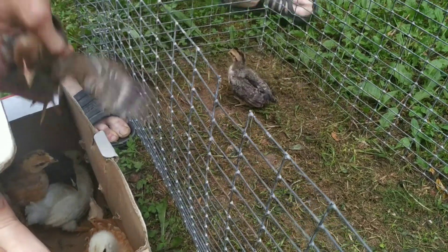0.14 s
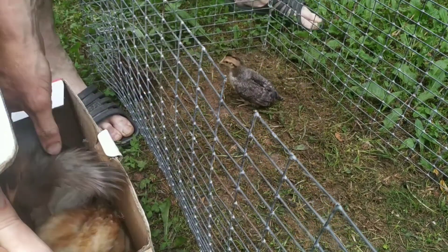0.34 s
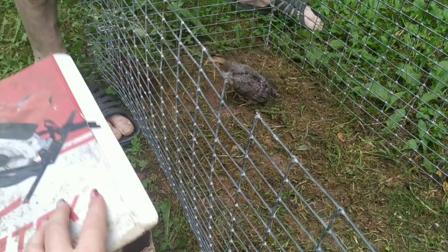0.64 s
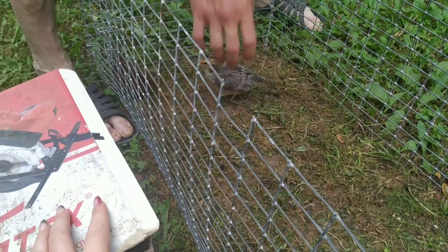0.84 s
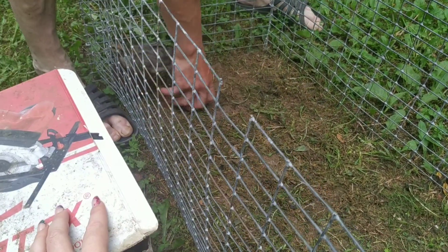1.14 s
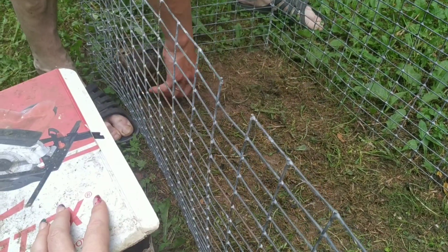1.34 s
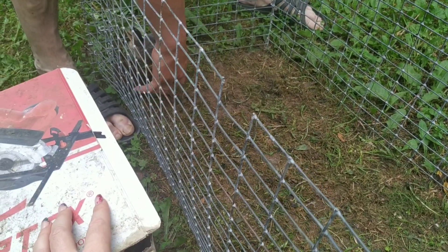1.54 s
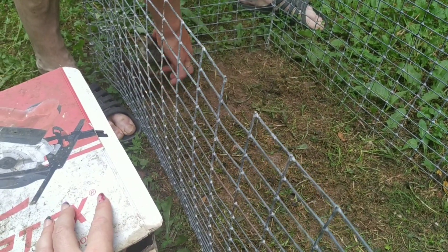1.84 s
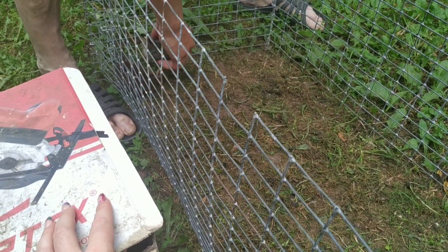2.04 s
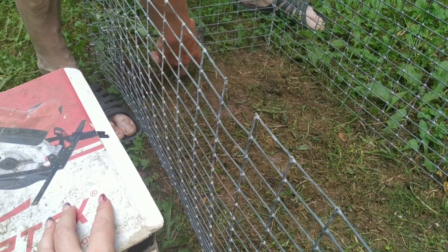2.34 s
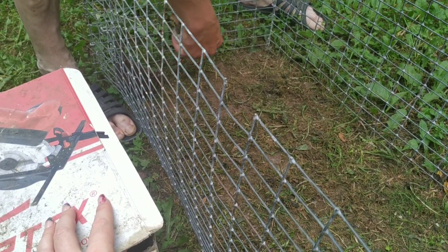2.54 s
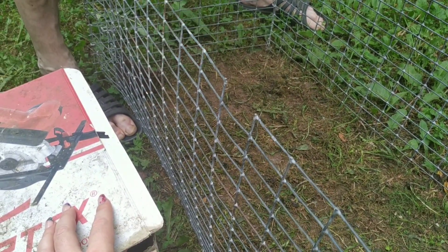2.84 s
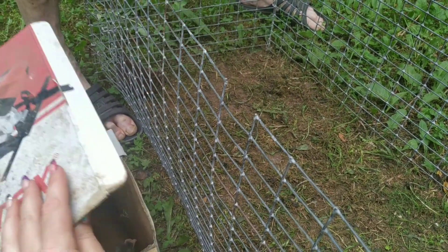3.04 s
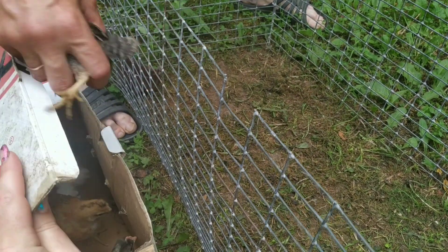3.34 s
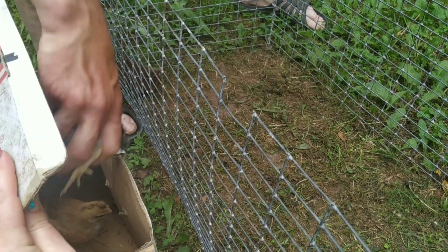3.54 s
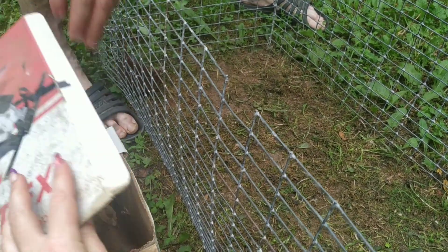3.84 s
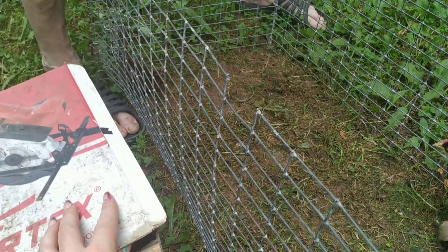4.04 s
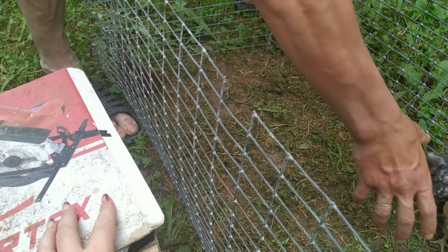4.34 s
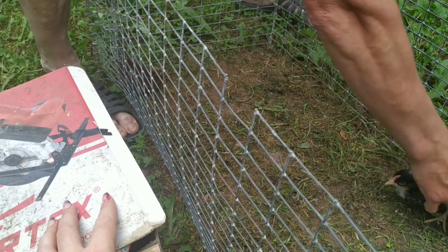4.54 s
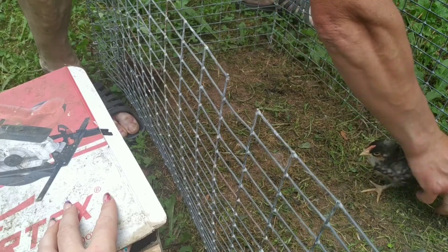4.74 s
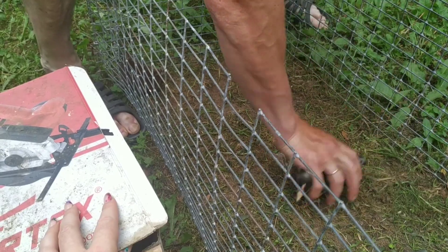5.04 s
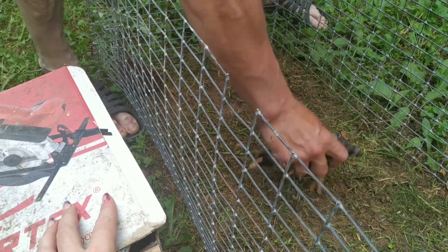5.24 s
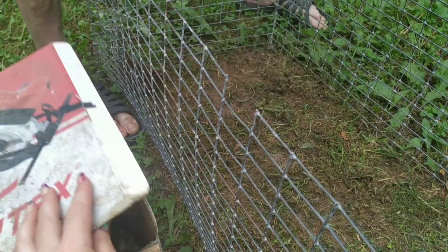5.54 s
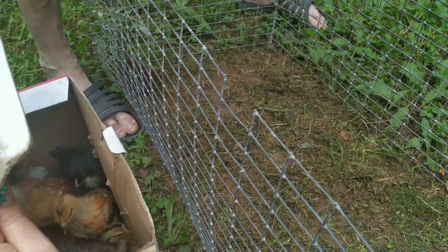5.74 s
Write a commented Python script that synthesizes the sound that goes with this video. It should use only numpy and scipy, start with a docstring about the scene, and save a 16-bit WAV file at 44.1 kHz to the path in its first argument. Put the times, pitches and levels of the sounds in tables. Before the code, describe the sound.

Young chicks peep and chirp in short high whistles while a cardboard box knocks, rustles and squeaks outdoors.

```python
"""Chicks in a cardboard box

Chicks peep, chirp and cry in gliding whistles while hands lift them out of a box on grass.
Their feet scrabble and knock on the board, claws and stalks snap, down and grass rustle,
and the lid and fence squeak by stick-slip under the hands. Two spaced microphones hear
each sound a little apart in time, with short echoes, outdoor air and light wind."""
import sys
import numpy as np
from scipy import signal
from scipy.fft import rfft, irfft, next_fast_len
from scipy.io import wavfile
from scipy.ndimage import uniform_filter1d

SR = 44100
rng = np.random.default_rng(int(sys.argv[2]) if len(sys.argv) > 2 else 0)


def to_wav(s):
    """Save 16-bit WAV."""
    ch = np.atleast_2d(s).T  # columns
    pcm = np.round(np.clip(ch, -1, 1) * 32767)  # PCM
    wavfile.write(sys.argv[1], SR, pcm.astype(np.int16))


N = 259308


def amp(db):
    return 10 ** (np.asarray(db) / 20)


def unit_rms(x):
    return x / np.sqrt(np.mean(x ** 2) + 1e-20)


def wander(count, hz):
    """Smooth noise of rms 1, turning about hz times a second."""
    size = max(int(SR / hz), 1)
    noise = rng.standard_normal(count + 2 * size)
    return unit_rms(uniform_filter1d(uniform_filter1d(noise, size), size)[size:-size])


def place(mix, start_s, sound, left_lag_ms):
    """Add a sound to both channels; the farther microphone hears it later and weaker."""
    size = next_fast_len(len(sound) + 64)
    lag_ms = np.array([[left_lag_ms], [-left_lag_ms]])
    margin_s, shade_db_per_ms = .001, -1.5
    delay = np.exp(-2j * np.pi * np.fft.rfftfreq(size, 1 / SR) * (margin_s + lag_ms / 2000))
    pair = irfft(rfft(sound, size) * delay, size) * amp(shade_db_per_ms * lag_ms)
    part = mix[:, max(round((start_s - margin_s) * SR), 0):][:, :size]
    part += pair[:, :part.shape[1]]


def arch(t, times_s, values):
    """Cubic curve through the points, flat at each turning point."""
    step = np.diff(values) / np.diff(times_s)
    product = step[1:] * step[:-1]
    inner = np.where(product > 0, 2 * product / (step[1:] + step[:-1] + 1e-9), 0)
    slope = np.r_[step[0], inner, step[-1]]
    slope[[0, -1]] = 2 * slope[[0, -1]] - slope[[1, -2]]
    k = np.clip(np.searchsorted(times_s, t) - 1, 0, len(times_s) - 2)
    span = np.diff(times_s)[k]
    u = np.clip((t - times_s[k]) / span, 0, 1)
    bend = (slope[k] - step[k]) * (1 - u) - (slope[k + 1] - step[k]) * u
    return values[k] + span * u * (step[k] + (1 - u) * bend)


def bent_contour(start_s, length_s, bend_share, first_hz, bend_hz, last_hz, level_db, swell_db):
    """Start, bend and end as rows of time_s, pitch_hz, level_db."""
    return [(start_s, first_hz, level_db - swell_db),
            (start_s + np.clip(bend_share, .05, .95) * length_s, bend_hz, level_db),
            (start_s + length_s, last_hz, level_db + swell_db)]


def glide(contour, partials_db, jitter, flutter_db, hiss_db, colour_db=np.zeros_like):
    """Fluttering harmonics and hiss on a wavering pitch; the level dips where the pitch leaps."""
    times_s, pitch_hz, level_db = np.transpose(contour)
    t = np.arange(times_s[0], times_s[-1] + .0052, 1 / SR)
    hz = arch(t, times_s, pitch_hz)
    leap_db = -22 * uniform_filter1d(abs(np.gradient(hz)), 180) * SR / 1e6
    hz = hz * (1 + jitter * wander(len(t), hz=406))
    phase = 2 * np.pi * np.cumsum(hz) / SR
    sound = amp(hiss_db) * signal.lfilter([1, 0, -1], [1, -.4], rng.standard_normal(len(t)))
    for k, partial_db in enumerate(partials_db, 1):
        flutter = 1.67 * np.tanh(wander(len(t), hz=184))
        rasp = 1 + min(28 * jitter, .38) * wander(len(t), hz=1500)
        gain = amp(partial_db + colour_db(k * hz) + flutter_db * flutter)
        sound += gain * rasp * np.sqrt(2) * np.sin(k * phase) * (k * hz < SR / 2)
    attack = (t - t[0]) / .006 + (times_s[0] <= 0)
    fade = np.clip(np.minimum(attack, (t[-1] - t) / .005), 0, 1)
    return sound * amp(np.interp(t, times_s, level_db) + leap_db) * fade


def throat_db(hz):
    """Throat and beak: one resonance on a falling slope."""
    offset_hz = hz - 2780
    return 3.5 * np.exp(-(offset_hz / 370) ** 2) - 1.5 * offset_hz / 1000


def chick_voice(contour):
    """Near-sine whistle; harsher, breathier and less steady at full force."""
    force = np.clip((np.max(contour, axis=0)[2] + 34) / 18, 0, 1)
    held_db = min(40 * (contour[-1][0] - contour[0][0]), 8)  # a long whistle shows its octave
    partials_db = [-3, -22 + 12 * force + held_db, -30 + 12 * force, -30 + 17 * force, -33 + 19 * force]
    return glide(contour, partials_db, jitter=.003 + .012 * force, flutter_db=2 + 2.5 * force,
                 hiss_db=-29 + 8 * force, colour_db=throat_db)


# Peeps: start_s, length_s, bend_share, first_hz, bend_hz, last_hz, level_db, swell_db, left_lag_ms
PEEPS = [(0.036, 0.036, 0.36, 4320, 3736, 2770, -16.5, -6, -0.0034),
         (5.763, 0.07, .45, 4000, 3830, 2790, -44, -10, 0.2),
         (0.225, 0.054, 0.64, 4130, 3410, 2270, -29.5, 3.5, 0.12),
         (0.263, 0.038, 0.4, 4180, 4720, 4460, -26, 5, 0.26),
         (0.45, 0.024, 0.24, 4120, 2270, 2390, -32, -1, -0.07),
         (0.571, 0.017, 0.6, 4440, 2120, 2310, -27, -14, 0.2),
         (0.777, 0.038, 0.68, 3550, 3290, 2710, -35.5, -5.5, 0.35),
         (0.826, 0.09, 0.13, 3350, 3380, 3180, -42.5, -1, 0.055),
         (1.945, 0.045, 0.88, 3810, 3510, 3150, -28.5, 1, 0.36),
         (2.687, 0.045, 0.62, 3580, 3380, 3010, -38.5, 2, -0.39),
         (2.942, 0.23, 0.73, 3385, 3020, 2060, -39, 1.5, -0.1),
         (3.097, 0.08, 0.7, 3550, 3540, 3080, -33.5, 0.5, 0.39),
         (3.544, 0.032, 0.2, 3060, 3380, 2870, -38.5, -6, 0.37),
         (3.696, 0.027, 0.34, 3500, 4060, 2970, -35, 2, 0.26),
         (3.751, 0.061, 0.3, 4200, 3840, 2590, -23, 0.5, .13),
         (3.926, 0.042, 0.46, 4260, 4310, 2450, -35.5, 14.5, 0.25),
         (4.019, 0.043, 0.39, 3700, 4050, 3070, -34, 1.5, 0.33),
         (4.068, 0.044, .72, 2535, 2500, 1870, -30.5, -1.5, 0.1),
         (4.13, 0.029, 0.07, 3720, 4000, 2570, -32.5, -9, 0.33),
         (4.169, 0.2, 0.79, 3655, 3320, 1793, -29, 2, 0.21),
         (4.62, 0.097, 0.23, 3780, 3930, 3420, -33.5, 6, 0.57),
         (4.701, 0.038, 0.24, 3240, 3847, 1894, -27.5, -6, .44),
         (4.967, 0.038, 0.33, 3290, 4150, 2850, -26.5, 3, -0.27),
         (5.11, 0.036, 0.7, 3025, 4010, 2900, -20, 9.5, -0.223),
         (5.149, 0.031, 0.03, 3320, 3700, 2547, -12, -3.5, 0.1)]


def peeps():
    """Whistles with one bend in pitch."""
    mix = np.zeros((2, N))
    for start_s, *shape, left_lag_ms in PEEPS:
        place(mix, start_s, chick_voice(bent_contour(start_s, *shape)), left_lag_ms)
    return mix


# Cries: start_s, rise_s, drop_s, half_wobble_s, first_hz, top_hz, low_hz, rebound_hz,
# level_db, left_lag_ms
CRIES = [(0.897, 0.0029, 0.016, 0.0098, 3640, 3600, 2306, 3190, -24.5, -0.15),
         (1.015, 0.0028, 0.01, 0.01, 4430, 4440, 2566, 3610, -27, 0.28),
         (5.298, 0.027, 0.016, 0.012, 2383, 4010, 2590, 3575, -15.5, 0.33),
         (5.469, 0.021, 0.017, 0.013, 2430, 4166, 2687, 3184, -15.5, 0.321),
         (5.682, 0.026, 0.02, 0.013, 2076, 3895, 2490, 3350, -19, 0.17)]


def cries():
    """Whistles that rise, hang, tumble to their loudest point and die in a wobble."""
    mix = np.zeros((2, N))
    hang_share, turns_db = .57, np.array([-22, -4, -4, 0, -3.5, -7, -23.5])
    for start_s, rise_s, drop_s, half_wobble_s, *pitches_hz, level_db, left_lag_ms in CRIES:
        first_hz, top_hz, low_hz, rebound_hz = pitches_hz
        steps_s = [0, rise_s, hang_share * drop_s, (1 - hang_share) * drop_s] + 3 * [half_wobble_s]
        shoulder_hz = top_hz - .4 * (top_hz - low_hz)
        turns_hz = [first_hz, top_hz, shoulder_hz, low_hz, rebound_hz, low_hz, rebound_hz]
        contour = np.c_[start_s + np.cumsum(steps_s), turns_hz, level_db + turns_db]
        place(mix, start_s, chick_voice(contour), left_lag_ms)
    return mix


# Chirps: start_s, length_s, first_hz, last_hz, base_db, left_lag_ms
CHIRPS = [(1.971, 0.044, 2500, 2250, -46, -0.31), (0.0, 0.03, 2630, 2160, -49, 0.011),
          (3.475, 0.016, 5380, 4120, -39.5, 0.22), (3.511, 0.03, 3300, 2300, -52, 0.048),
          (4.782, 0.028, 3840, 2680, -47, 0.23), (4.394, 0.057, 2390, 2606, -54, 0.31),
          (5.564, .035, 3630, 3380, -52, 0.29), (5.621, 0.029, 3650, 3400, -50, 0.5),
          (5.802, 0.028, 2940, 2750, -44, 0.36), (0.188, 0.02, 2950, 2290, -43.5, 0.5),
          (0.481, 0.017, 3080, 2040, -39, -0.11), (1.502, 0.063, 2136, 2910, -41.5, -0.33),
          (1.917, 0.04, 2060, 1960, -41.5, -0.34), (2.046, 0.062, 2145, 2750, -48.5, -0.061),
          (2.11, 0.03, 4420, 3290, -39.5, -0.63), (2.139, 0.013, 3550, 3200, -41.5, -0.066),
          (2.29, 0.0095, 2440, 1850, -42, -0.41), (2.478, 0.015, 4000, 3170, -40.5, 0.36),
          (2.96, 0.02, 3190, 2490, -48.5, 0.075), (3.143, 0.071, 2935, 2240, -41.5, -0.15),
          (3.241, 0.1, 3770, 2060, -44.5, 0.12), (3.254, 0.031, 3000, 2370, -51, 0.063),
          (3.421, 0.074, 3925, 2080, -38.5, -0.145), (3.445, 0.018, 2950, 1980, -43.5, -0.084),
          (3.841, 0.032, 2685, 2225, -37, 0), (3.875, 0.058, 3720, 1945, -41.5, 0.46),
          (3.9, 0.021, 5840, 4500, -43, .2), (4.558, 0.041, 3140, 2250, -48, -0.026),
          (5.657, 0.061, 2880, 2660, -36.5, 0.51), (5.778, 0.047, 3570, 2700, -43, 0.36)]


def chirps():
    """Short, straight whistled glides that fade as they go."""
    mix = np.zeros((2, N))
    for start_s, length_s, first_hz, last_hz, base_db, left_lag_ms in CHIRPS:
        contour = [(start_s, first_hz, base_db + 11), (start_s + length_s, last_hz, base_db + 3.5)]
        place(mix, start_s, chick_voice(contour), left_lag_ms)
    return mix


# Lid and fence squeaks: start_s, length_s, bend_share, first_hz, bend_hz, last_hz, level_db,
# swell_db, left_lag_ms, second_partial_db, third_partial_db, fourth_partial_db, roughness
SQUEAKS = [(0.0, 0.057, 0.46, 5140, 5130, 4630, -21.5, 3, 0.084, -27, -30, -40, 0.11),
           (0.0, 0.029, 0.55, 5150, 4840, 4630, -24, 2.5, 0.0064, -25, -30, -40, 0.1),
           (1.288, 0.015, 0.78, 1603, 1594, 1400, -19.5, 6, -0.35, -5, -35, -27, 0.19),
           (1.303, 0.025, 0.35, 1327, 1266, 1377, -25.5, -4, -0.39, 9, 1, -11, 0),
           (1.318, 0.045, 0.48, 1382, 1424, 1322, -15, -0.5, -0.29, -7.5, -6, -12, 0),
           (1.357, 0.071, 0.42, 1283, 1278, 1256, -23.5, -7, -0.33, -9, -4.5, -19, 0.07),
           (1.35, 0.07, 0.53, 1417, 1411, 1415, -30.5, -8, -0.08, -0.5, -0.5, -18, 0.09),
           (1.457, 0.11, 0.34, 824, 924, 1153, -37, -5, -0.31, -5.5, -7.5, -10.5, 0.71),
           (1.811, 0.06, 1, 1587, 1795, 1640, -26.5, 0, 0.12, -4.5, -35, -27, 0.17),
           (1.929, 0.099, 0.69, 656, 813, 730, -32.5, -6, -0.43, -23, -17, -14.5, 0.08),
           (2.302, 0.052, 0.35, 842, 793, 750, -42, -2.5, -0.34, -23, -5.5, -5.5, 0.35),
           (4.252, 0.064, 0.67, 534, 740, 677, -32.5, -3, -0.4, -13, -7, -15, 0.24),
           (4.947, 0.038, 0.45, 561, 677, 817, -35.5, 4.5, -0.38, -5, -3, -17, 0.56),
           (4.973, 0.029, 0.49, 775, 853.6, 863, -18.5, 4, -0.34, -1, -13.5, -16, 0.14),
           (5.004, 0.0704, 0.9, 1178, 1323, 1328, -23.5, 2.5, -0.301, 5.5, -12, -1, 0.51),
           (5.079, 0.037, 0.63, 1300, 1247, 1260, -30.5, 3.5, -0.32, -4, -13, -28, 0.65),
           (5.083, 0.031, 0.2, 855, 842, 740, -30, -27, -0.3, -10, -18, -27, 0.54),
           (0.741, 0.098, 0.91, 6670, 6620, 6730, -38.5, 9, 0, -37, -38, -40, 0.05),
           (0.838, 0.064, 0.45, 6800, 7130, 7060, -43, -6, 0, -30, -40, -40, 0.25),
           (1.848, 0.075, 0.33, 7050, 7240, 6840, -39, 3.5, 0.37, -13, -40, -19, 0.58),
           (2.23, 0.081, 0.66, 7370, 6440, 6550, -38.5, -6, 0.11, -6.5, -40, -40, 0.24)]


def squeaks():
    """Stick-slip with uneven partials; irregular slips smear the pitch and add grit."""
    mix = np.zeros((2, N))
    for start_s, *shape, left_lag_ms, second_db, third_db, fourth_db, roughness in SQUEAKS:
        upper_db = max(third_db, fourth_db) - 12 - 1.95 * np.arange(5)
        partials_db = [0, second_db, third_db, fourth_db, *upper_db]
        squeak = glide(bent_contour(start_s, *shape), partials_db, jitter=.0492 * roughness,
                       flutter_db=1.5 + 3 * roughness, hiss_db=-24 + 18 * roughness)
        place(mix, start_s, squeak, left_lag_ms)
    return mix


def ring(hz, width_hz, t):
    """One decaying mode."""
    return np.exp(-np.pi * width_hz * t) * np.sin(2 * np.pi * hz * t)


# Box modes: pitch_hz, width_hz, level_db
BOX_MODES = [(112, 50, -6.5), (297.5, 69, -2), (394, 65, -5), (1167, 120, -8)]
# Blows on the board: start_s, level_db, panel_hz, slap_db
KNOCKS = [(0.288, -19, 338, 2), (0.44, -22, 162, -13), (0.573, -20.5, 286, -3.5), (0.664, -20, 255, -22),
          (0.786, -21.5, 346, -1), (0.849, -23.5, 332, -29), (0.9562, -23.5, 328, -1),
          (0.992, -9, 267, -9.5), (1.0646, -23.5, 463, 5.5), (1.124, -26, 330, -20),
          (1.176, -16.5, 258, -6), (1.417, -22, 292, -9), (1.494, -23, 263, -2), (2.258, -34, 128, 8),
          (2.457, -24.5, 270, -6), (2.603, -25.5, 256, -1.5), (2.982, -29, 306, -18),
          (3.1, -21.5, 174, -10.5), (3.246, -26.5, 300, -4), (3.656, -29, 331, 1), (3.832, -17.5, 188, -25),
          (3.996, -37.5, 316, 9.5), (4.142, -24, 338, -13), (4.404, -39, 265, 10.5), (4.672, -28, 317, 1),
          (4.872, -29.5, 394, 5), (5.002, -29, 260, 0), (5.31, -30, 149, -4.5), (5.605, -26, 228, -4),
          (5.72, -17.5, 331, -7)]


def knocks():
    """A blow rings panel and box, a hard one slaps, and a weaker bounce follows."""
    mix, t = np.zeros((2, N)), np.arange(3000) / SR
    bounces_s = .00795 + .00737 * rng.random(len(KNOCKS))
    for (start_s, level_db, panel_hz, slap_db), bounce_s in zip(KNOCKS, bounces_s):
        box = sum(amp(db) * ring(hz, width_hz, t) for hz, width_hz, db in BOX_MODES[:-1])
        heave_db = 1.35 * (level_db + 9.5) - 6  # a heavy blow moves the whole box
        body = ring(panel_hz, .19 * panel_hz, t) + .18 * box + amp(heave_db) * ring(*BOX_MODES[0][:2], t)
        bounce = .57 * np.roll(body, int(bounce_s * SR))
        burst = rng.standard_normal(len(t)) * amp(-60 * t / .06)
        slap = signal.oaconvolve(burst, ring(BOX_MODES[-1][0], 1670, t[:200]))[:len(t)]
        knock = (body + bounce + amp(slap_db) * slap / abs(slap).max()) * np.minimum(t / .0015, 1)
        place(mix, start_s, amp(level_db) * knock, left_lag_ms=.21)
    return signal.lfilter(*signal.butter(1, 70, "high", fs=SR), mix)  # the knocks carry no deep bass


# Claw and stalk snaps: start_s, level_db, ring_db
SNAPS = [(0.138, -27.5, -5), (0.3188, -20, -1), (0.637, -20, -20), (1.104, -37, -17), (1.1572, -19.5, 4),
         (1.825, -35, 2), (2.178, -22.5, 11), (3.4633, -20, -32), (3.517, -29, -26), (3.5908, -41, 9),
         (3.7, -36, 13.5), (3.952, -17.5, -30), (4.171, -27.5, -2), (4.473, -27.5, 3)]


def snaps():
    """Milliseconds of dry crackle with a short ring of the board."""
    mix, t = np.zeros((2, N)), np.arange(1500) / SR
    for start_s, level_db, ring_db in SNAPS:
        burst = rng.standard_normal(len(t)) * amp(-60 * t / .022) * np.minimum(t / .002, 1)
        crack = signal.lfilter([.8, .5, -.6], [1, -.3], burst)
        snap = crack / abs(crack).max() + amp(ring_db) * ring(1203, 180, t)
        place(mix, start_s, amp(level_db) * snap, left_lag_ms=.3)
    return mix


def grains(per_s, spread_db):
    """Sparse clicks, most small, a few large."""
    return amp(spread_db * np.minimum(rng.exponential(1, N), 4)) * (rng.random(N) < per_s / SR)


def diffuse_noise(spectrum, patchy_db, spacing_ms=.39):
    """Noise from all around, alike in both microphones only for waves longer than their spacing."""
    frames, hz = N // 128 + 5, np.fft.rfftfreq(512, 1 / SR)
    left_re, left_im, apart_re, apart_im, patches = rng.standard_normal((frames, 257, 5)).T
    patches = unit_rms(uniform_filter1d(uniform_filter1d(patches, 6, 0), 10, 1))
    coherence = .93 * np.sinc(2 * hz * spacing_ms / 1000)[:, None]
    left = left_re + 1j * left_im
    right = coherence * left + np.sqrt(1 - coherence ** 2) * (apart_re + 1j * apart_im)
    points_hz, points_db = np.transpose(spectrum)
    gain = amp(np.interp(np.log(hz + 1), np.log(points_hz), points_db)[:, None] + patchy_db * patches)
    return signal.istft(np.array([left, right]) * gain, nperseg=512, noverlap=384)[1][:, :N]


# Handling levels: time_s, feet_db, rustle_db
HANDLING = [(0.0, -65, -61), (0.18, -49, -45.5), (0.508, -33.5, -35), (0.87, -48, -42), (1.11, -42, -37),
            (1.33, -43, -32), (1.54, -47.5, -43), (1.91, -48, -45), (2.88, -53.5, -53), (3.1, -51.5, -47.5),
            (3.42, -52, -47), (3.78, -40, -38), (4.08, -38.5, -40.5), (4.27, -43, -47), (4.45, -43, -45.5),
            (4.72, -82, -87), (5.25, -60.5, -53), (5.88, -52.5, -48)]
# Rustle spectrum: frequency_hz, density_db
RUSTLE_SPECTRUM = [(200, -28), (700, 6), (1500, 3.5), (3000, 5), (6000, 0.5), (10000, 0), (13000, -4.5),
                   (16000, -5)]


def scrabble_and_rustle():
    """Small feet tap the box modes; down, skin and grass rustle in quick scuffs."""
    times_s, feet_db, rustle_db = np.transpose(HANDLING)
    t, grain_t = np.arange(N) / SR, np.arange(2500) / SR
    feet = np.zeros(N)
    for hz, width_hz, db in BOX_MODES:
        taps = grains(per_s=130, spread_db=6) * rng.choice([-1, 1], N)
        feet += amp(db) * signal.oaconvolve(taps, ring(hz, width_hz, grain_t))[:N]
    feet = unit_rms(np.array([np.roll(feet, 8), feet]))  # the box stands to one side
    scuff = amp(-60 * grain_t / .055) * np.minimum(grain_t / .012, 1)
    scuffs = unit_rms(signal.oaconvolve(grains(per_s=90, spread_db=4), scuff)[:N])
    fibre_crunch = unit_rms(signal.oaconvolve(grains(per_s=350, spread_db=4), np.hanning(350))[:N])
    rustle = unit_rms(diffuse_noise(RUSTLE_SPECTRUM, patchy_db=-2.5) * (.7 + scuffs) * (2.2 + fibre_crunch))
    return amp(np.interp(t, times_s, feet_db)) * feet + amp(np.interp(t, times_s, rustle_db)) * rustle


def echoes(sound, rt60_s=.16):
    """Box walls, ground and people scatter a short tail, one for each channel."""
    t = np.arange(int(.25 * SR)) / SR
    taps = rng.choice([-1., 1.], (2, len(t))) * (rng.random((2, len(t))) < .05)
    taps *= amp(-60 * t / rt60_s) * (t > .003)
    return signal.oaconvolve(sound, taps / np.linalg.norm(taps[0]), axes=1)[:, :N]


# Outdoor air spectrum: frequency_hz, density_db
AIR_SPECTRUM = [(29, 5.5), (50, 3), (306, -15.5), (1660, -22), (2880, -11), (4560, -24), (9870, -26.5),
                (14500, -41), (16000, -48)]


def outdoor_air():
    """Quiet, patchy noise from all around."""
    return amp(-48) * unit_rms(diffuse_noise(AIR_SPECTRUM, patchy_db=3))


def wind():
    """Light gusts buffet each microphone separately."""
    return np.array([amp(db) * wander(N, hz=58.6) * amp(2.9 * wander(N, hz=1.9)) for db in (-66, -60)])


def scene():
    """Calls, squeaks and snaps with their echoes, over box noises and air."""
    near = chirps() + peeps() + cries() + squeaks() + snaps()
    background = outdoor_air() + wind()
    return near + amp(-10) * echoes(near) + knocks() + scrabble_and_rustle() + background


def record(dry):
    """Band limit at 16.2 kHz."""
    lowpass = signal.firwin(511, 16200, window=("kaiser", 9), fs=SR)
    return signal.oaconvolve(dry, lowpass[None], "same", axes=1)


dry = scene()
out = record(dry)
to_wav(out)
```